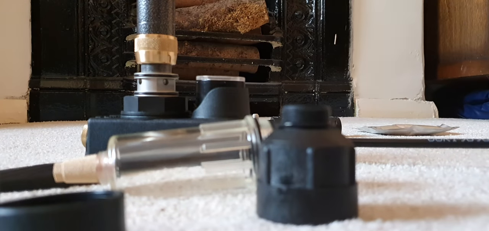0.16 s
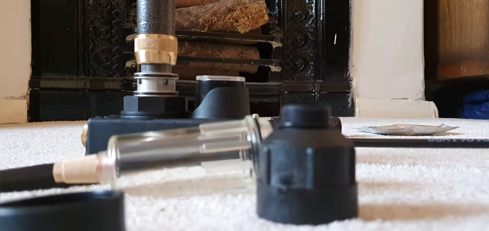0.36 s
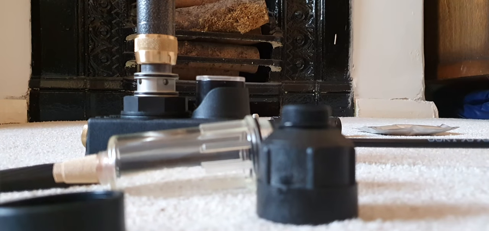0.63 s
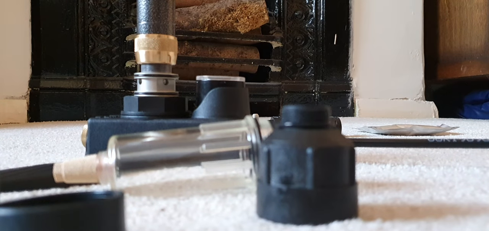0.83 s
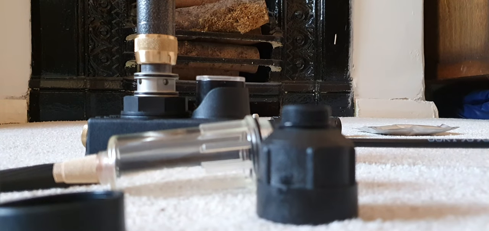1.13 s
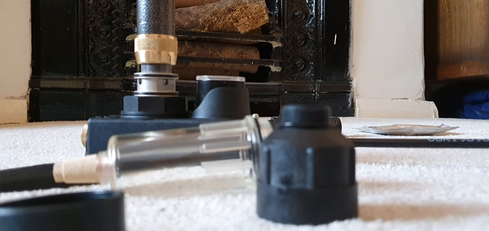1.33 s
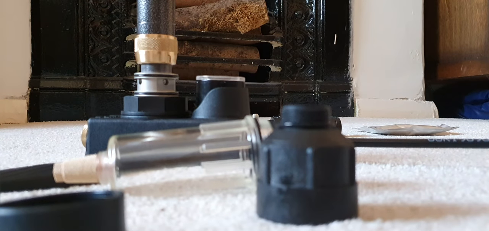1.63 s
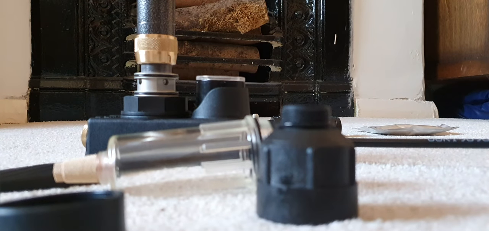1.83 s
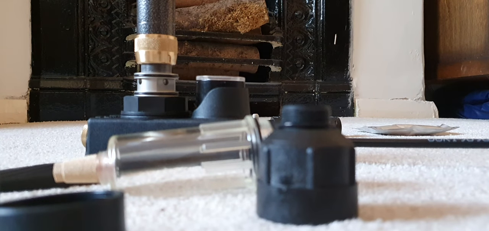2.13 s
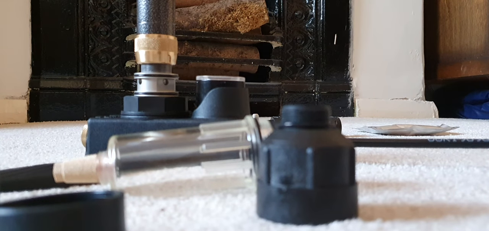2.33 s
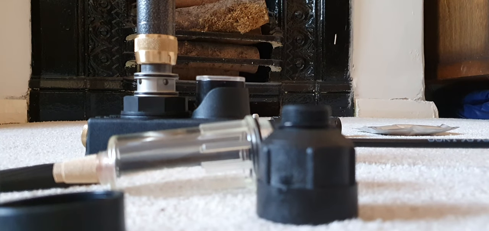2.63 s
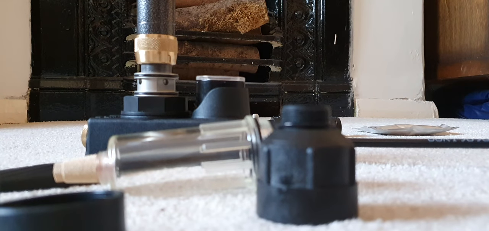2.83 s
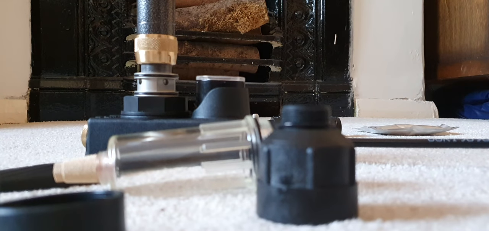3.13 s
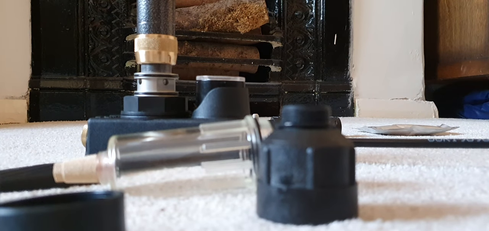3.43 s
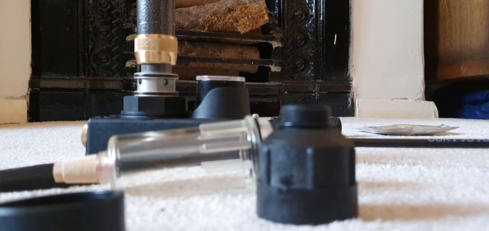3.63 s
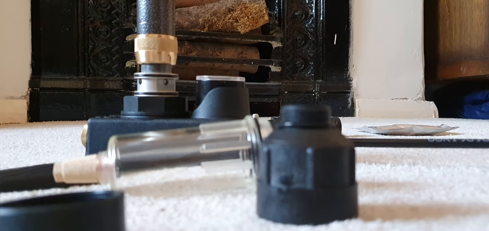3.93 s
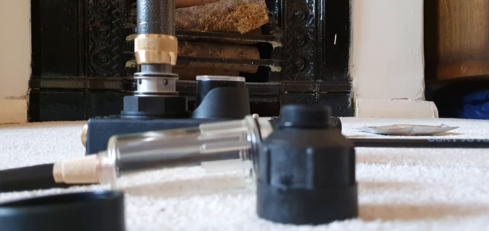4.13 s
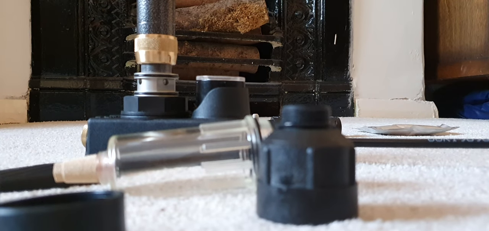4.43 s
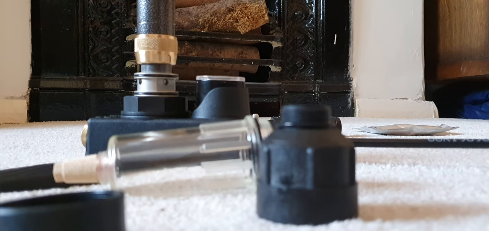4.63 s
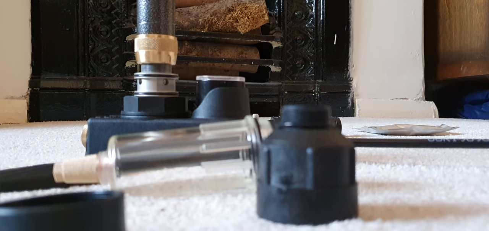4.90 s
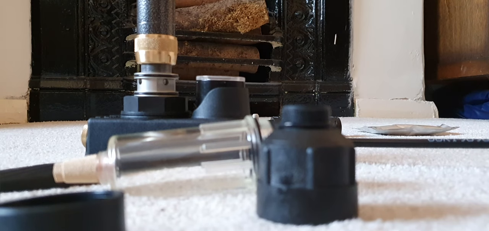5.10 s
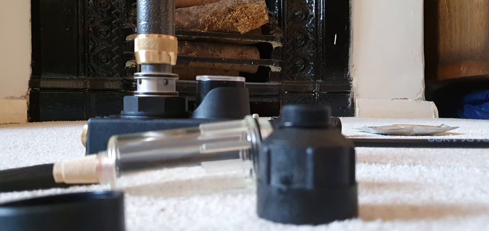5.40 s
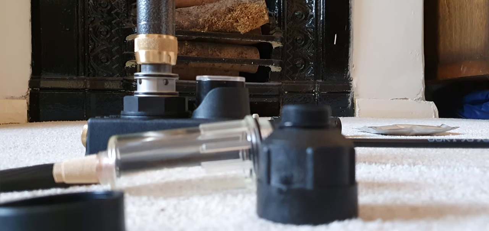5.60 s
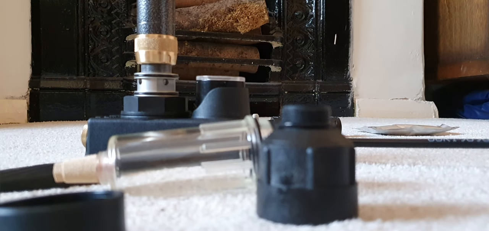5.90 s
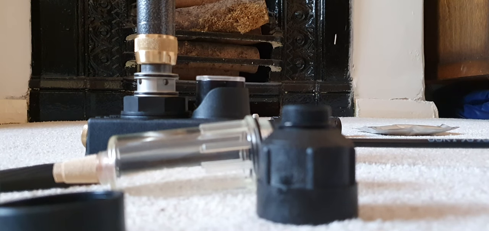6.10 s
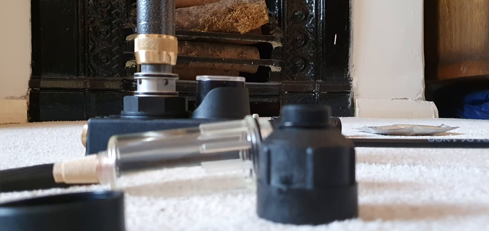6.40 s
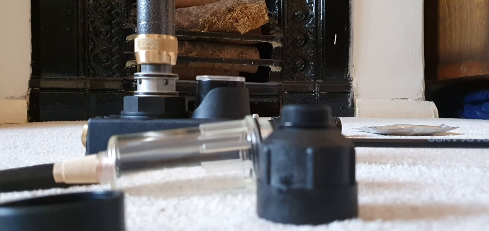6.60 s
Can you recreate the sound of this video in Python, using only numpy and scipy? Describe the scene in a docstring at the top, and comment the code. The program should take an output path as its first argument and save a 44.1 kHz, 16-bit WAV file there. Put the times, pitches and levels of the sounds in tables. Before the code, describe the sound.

Fingers slide over a foil sachet, making short bursts of bright rustling and sharp snaps. A quick, jerky rip comes early, followed by more crinkling and a brief lull. A second short tear arrives in a cluster of crackles, then a few last rustles follow. The sachet is close to the stereo microphone and to the right, in a quiet living room with a faint appliance hum.

```python
"""Tearing open a foil sachet

Living room, stereo camera microphones, the sachet close by and to the right, opened in two pulls.
Fingers slide over the foil, creases buckle with sharp snaps and whole panels flex with a low pop;
each tear is a rush of tiny fractures. The room answers softly over an appliance's faint, beating hum."""
import sys
import numpy as np
from scipy import signal
from scipy.fft import rfft, irfft, next_fast_len
from scipy.io import wavfile
from scipy.ndimage import map_coordinates

SR = 44100
rng = np.random.default_rng(int(sys.argv[2]) if len(sys.argv) > 2 else 0)


def to_wav(s):
    """Save 16-bit WAV."""
    ch = np.atleast_2d(s).T  # columns
    pcm = np.round(np.clip(ch, -1, 1) * 32767)  # PCM
    wavfile.write(sys.argv[1], SR, pcm.astype(np.int16))


N = 297675


def amp(db):
    """Decibels to gain."""
    return 10 ** (np.asarray(db) / 20)


def unit(x):
    """Scale to rms 1."""
    return x / np.sqrt(np.mean(x ** 2) + 1e-20)


def along(points, hz):
    """Read a curve of (f/Hz, value) points on a log frequency axis."""
    f, values = np.transpose(points)
    return np.interp(np.log(hz + 1), np.log(f), values)


def coloured(x, spectrum, size=2048):
    """Pass x through the causal (minimum-phase) filter that has this spectrum."""
    hz = np.fft.rfftfreq(size, 1 / SR)
    cepstrum = irfft(np.log(amp(along(spectrum, hz))))
    cepstrum[1:size // 2] *= 2
    cepstrum[size // 2 + 1:] = 0
    response = irfft(np.exp(rfft(cepstrum)))
    return signal.fftconvolve(x, response[None], axes=1)[:, :x.shape[1]]


# spectrum of the still living room: f/Hz, relative level/dB
ROOM_TONE = [(20, -40.5), (35, -13), (60, -3), (100, 1), (130, -7), (190, -1), (420, -12), (780, -15.5),
             (1400, -37), (2100, -31.5), (3000, -48), (7000, -34), (16000, -45)]
def room_tone(level_db=-69, side_db=-9):
    """Quiet room noise, nearly alike at both microphones."""
    mid, side = unit(coloured(rng.standard_normal((2, N)), ROOM_TONE, size=8192))
    side = amp(side_db) * side
    return amp(level_db) * np.array([mid + side, mid - side])


# motor tones: f/Hz, level/dB
MOTOR_TONES = [(44.1, -73.5), (49.3, -65), (98.7, -76.5)]
def appliance_hum():
    """Two motors beat against each other in a distant appliance."""
    t = np.arange(N) / SR
    return sum(amp(db) * np.sin(2 * np.pi * (hz * t + rng.random())) for hz, db in MOTOR_TONES)


# reverberation of the living room: f/Hz, time to fade by 60 dB/s
ROOM_DECAY = [(100, .5), (500, 0.24), (1500, 0.22), (4000, 0.36), (8000, 0.12), (16000, 0.26)]
def room_echo(x, delay_s=0.004):
    """The room returns a different diffuse tail to each microphone; the bass lingers longest."""
    hz, t, noise = signal.stft(rng.standard_normal((2, SR // 2)), SR, nperseg=256)
    decay = amp(-60 * t / along(ROOM_DECAY, hz)[:, None])
    tail = signal.istft(noise * decay, SR, nperseg=256)[1]
    tail = np.pad(tail / np.linalg.norm(tail[0]), ((0, 0), (round(delay_s * SR), 0)))
    return signal.fftconvolve(x[1:], tail, axes=1)[:, :N]


# shadow at the left microphone, which faces away from the sachet: f/Hz, level/dB
MIC_SHADOW = [(100, -6.5), (600, -6.5), (1400, -2), (3000, -7.5), (7000, -4.5), (8000, -11), (16000, -17.5)]
def mics(pair, alike, lag_samples=16):
    """The right microphone hears pair[0]; the left, later and shadowed, blends in its own paths, pair[1]."""
    far = alike * pair[:1] + np.sqrt(1 - alike ** 2) * pair[1:]
    left = np.pad(coloured(far, MIC_SHADOW)[0], (lag_samples, 0))[:N]
    return np.array([left, pair[0]])


def faint_ring(touch, ring_hz=778, q=70, under_db=-16, ceiling_db=-66):
    """One narrow, wavering resonance that comes and goes with the rustle."""
    ring = unit(signal.lfilter(*signal.iirpeak(ring_hz, q, SR), rng.standard_normal((2, N))))
    gain = np.minimum(amp(under_db) * touch[0], amp(ceiling_db))
    return mics(gain * ring, alike=0.8)


# fingertips meeting the sachet: t/s, relative level/dB
FINGER_BUMPS = [(0.251, -50), (0.439, -44), (2.421, -55), (6.253, -35), (6.519, -51)]
def bumps(thud_hz=330, life_s=0.02, gain_db=8):
    """Each soft push of a fingertip gives a short, dull thud."""
    thuds = np.zeros((2, N))
    t = np.arange(SR // 8) / SR
    thud = np.sin(2 * np.pi * thud_hz * t) * amp(-60 * t / life_s)
    for s, db in FINGER_BUMPS:
        thuds[0, round(s * SR):][:len(t)] += amp(db) * thud
    return amp(gain_db) * mics(thuds, alike=1)


def crackle(per_s, spread_db, life_s, smooth):
    """Envelope of random, uneven micro-bursts over a share of smooth friction."""
    happens = rng.random(N) < per_s / SR
    sizes = amp(spread_db * np.clip(rng.standard_normal(N), -2, 2))
    t = np.arange(SR // 50) / SR
    decay = amp(-60 * t / life_s)
    power = np.abs(signal.fftconvolve((happens * sizes) ** 2, decay ** 2)[:N])
    return np.sqrt(smooth + (1 - smooth) * power / power.mean())


def swells(rows, attack_s, release_s):
    """Facet and panel gains of hand movements: each builds, holds, then fades 60 dB in release_s."""
    t = np.arange(N) / SR
    power = np.zeros((2, N))
    for s, length, facet_db, panel_db in rows:
        near = slice(*np.searchsorted(t, [s, s + length + release_s]))
        age = t[near] - s
        rise = np.sin(np.pi / 2 * np.minimum(age / attack_s, 1)) ** 2
        fade = amp(-60 * np.maximum(age - length, 0) / release_s)
        power[:, near] += (amp([[facet_db], [panel_db]]) * rise * fade) ** 2
    return np.sqrt(power)


# spectrum of the fluttering panels: f/Hz, relative level/dB
PANEL_FLUTTER = [(20, -48.5), (60, -10), (130, -10.5), (280, -5.5), (450, -3.5), (620, -0.5), (950, -1),
                 (1150, -5.5), (1450, -13.5), (3000, -35)]
def foil(bursts, gains, facet_spectrum):
    """Bursts ring the foil's small facets brightly and shake its panels lower down."""
    facet_gain, panel_gain = gains
    facets = unit(coloured(bursts * rng.standard_normal((2, N)), facet_spectrum))
    panels = unit(coloured(bursts * rng.standard_normal((2, N)), PANEL_FLUTTER))
    return mics(facet_gain * facets, alike=0.19) + mics(panel_gain * panels, alike=0.78)


# strokes over the foil: t/s, length/s, facet level/dB, panel level/dB
FINGER_STROKES = [(-0.06, 0.071, -45.5, -55.5), (0.04, 0.088, -41, -55), (0.2, 0.11, -56, -63),
                  (0.305, 0.075, -41, -54.5), (0.392, 0.049, -33, -45.5), (0.495, 0.069, -45.5, -54.5),
                  (0.58, 0.08, -51.5, -55.5), (0.65, 0.055, -43.5, -51), (0.735, 0.089, -45.5, -51.5),
                  (0.85, 0.2, -50, -63), (1.11, 0.16, -56, -64.5), (1.235, 0.15, -41.5, -53),
                  (1.67, 0.06, -47, -54), (1.735, 0.08, -44, -59), (1.91, 0.077, -54.5, -67),
                  (2.025, 0.11, -51, -59.5), (2.125, 0.08, -37, -51), (2.21, 0.26, -50, -60.5),
                  (2.57, 0.057, -50.5, -65), (2.83, 0.125, -47.5, -54), (2.97, 0.07, -52.5, -67),
                  (3.675, 0.093, -55, -64), (3.885, 0.062, -46.5, -63.5), (3.99, 0.22, -53.5, -62),
                  (4.385, 0.12, -41, -52), (4.76, 0.06, -55.5, -73), (5.39, 0.076, -55, -59),
                  (5.85, 0.053, -47.5, -59), (5.95, 0.255, -51.5, -61.5), (6.2, 0.093, -41, -53),
                  (6.375, 0.093, -46.5, -54), (6.482, 0.057, -34.5, -39), (6.595, 0.071, -51, -51)]
def fingers(grip_facet_db=-66, grip_panel_db=-78, wander_db=2, shifts_per_s=14):
    """Facet and panel gains of the strokes, over a light grip that is never quite steady."""
    knots = rng.standard_normal(int(N * shifts_per_s / SR) + 4)
    wander = map_coordinates(knots, [np.arange(N) * shifts_per_s / SR])
    grip = amp(np.array([[grip_facet_db], [grip_panel_db]]) + wander_db * wander)
    return np.hypot(swells(FINGER_STROKES, attack_s=0.048, release_s=0.26), grip)


# the facets' main resonances, all that a light touch wakes: f/Hz, relative level/dB
LIGHT_BRUSH = [(600, -37.5), (1400, -24.5), (2100, -14.5), (2850, -5), (4200, -2), (5200, -7), (7200, -3.5),
               (8400, -12), (12700, -18.5), (16000, -21.5)]
def ticks(touch, per_s=140, pitch_hz=3600, pitch_spread=0.17, cycles=7, spread_db=5, size=400):
    """Tiny facets click over at random, each at its own pitch and gone within a few cycles."""
    when, pitch, force = rng.random((int(per_s * N / SR), 3)).T[:, :, None]
    start = (when * (N - size)).astype(int)
    hz = pitch_hz * (pitch / (1 - pitch)) ** (pitch_spread / 2)
    strength = amp(spread_db * np.minimum(-np.log(force), np.e))
    turns = hz * np.arange(size) / SR
    grains = strength * np.sin(2 * np.pi * turns) * amp(-60 * turns / cycles)
    clicks = np.bincount((start + np.arange(size)).ravel(), grains.ravel(), N)
    clicks = unit(coloured(clicks[None], LIGHT_BRUSH)[0])  # they ring the same sheet
    return mics(touch[0] * np.array([clicks, np.zeros(N)]), alike=0.9)


# spectrum of foil under firm fingers: f/Hz, relative level/dB
FIRM_CRINKLE = [(600, -36), (1400, -13.5), (2100, -5), (2850, 0), (4200, 0.5), (5000, -6), (7200, -5),
                (8400, -11.5), (12700, -12), (16000, -22)]
def handling(touch, firm_db=-55, blend_db=7):
    """Sliding fingertips set off small crackles; the firmer they press, the broader the sound."""
    bursts = crackle(per_s=500, spread_db=5, life_s=0.013, smooth=0.51)
    pressure_db = 20 * np.log10(touch[0])
    firm = (1 + np.tanh((pressure_db - firm_db) / blend_db)) / 2
    crinkle = np.sqrt(firm) * foil(bursts, touch, FIRM_CRINKLE)
    brush = np.sqrt(1 - firm) * foil(bursts, touch, LIGHT_BRUSH)
    return amp(-0.15) * (crinkle + brush) + amp(-5) * ticks(touch)


def stray_creases(touch, per_s=6, over_db=5.5, spread_db=3, pitch_hz=3200, pitch_spread=0.2, pop_db=-19):
    """Rows like MAIN_CREASES for slight creases that flip by chance, louder as the rustle grows."""
    rows = []
    for when, size, pitch in rng.uniform(-1, 1, (int(per_s * N / SR), 3)):
        at = int((when + 1) / 2 * (N - 1))
        rustle_db = 20 * np.log10(touch[0, at])
        snap_db = min(rustle_db + over_db, -42) + spread_db * size
        rows.append((at / SR, snap_db, pitch_hz * np.exp(pitch_spread * pitch), snap_db + pop_db))
    return rows


# spectra of a buckling crease and of the panel popping around it: f/Hz, relative level/dB
CREASE_CRACK = [(500, -30), (1400, -14), (2000, -4.5), (2800, -1.5), (4300, -5), (6800, -5.5), (8200, -9),
                (12700, -13), (16000, -21)]
PANEL_POP = [(20, -40), (60, -11), (130, -20), (280, -12), (450, -5), (700, -2.5), (1050, -2),
             (1450, -12.5), (3000, -64.5)]
# the main creases that buckle: t/s, snap level/dB, snap f/Hz, pop level/dB
MAIN_CREASES = [(0.1636, -20.5, 4300, -39.5), (0.4187, -30, 3270, -49), (0.4291, -33, 1900, -36),
                (0.6849, -27, 6640, -50), (0.7961, -25, 2900, -34), (0.8081, -30.5, 3280, -52),
                (0.9762, -34, 3700, -47), (0.9819, -30, 2600, -35.5), (1.2169, -26.5, 2600, -42),
                (1.2725, -33, 2720, -49.5), (1.467, -24, 4900, -55), (1.5519, -35, 4200, -21),
                (1.6313, -24.5, 3400, -44), (1.6568, -17.5, 3900, -35), (1.7108, -33.5, 3100, -53.5),
                (2.0447, -40.5, 3370, -47.5), (2.1392, -30.5, 3850, -43.5), (2.1826, -17.5, 4250, -49),
                (2.4228, -43, 4500, -42.5), (2.8405, -22, 6100, -35.5), (2.8765, -31.5, 2800, -36.5),
                (2.9263, -21.5, 2840, -26.5), (2.9446, -20, 4070, -37), (2.9527, -31.5, 2600, -31.5),
                (3.2242, -48, 6200, -61.5), (3.7298, -45, 3430, -44), (3.841, -47, 2190, -54),
                (4.0413, -30.5, 2070, -43.5), (4.0791, -25, 2340, -27.5), (4.1519, -25.5, 4100, -36),
                (4.1584, -32.5, 4020, -60), (4.2994, -22, 3320, -49), (4.3324, -21, 4100, -28),
                (4.3535, -14, 4000, -32), (4.447, -22, 5000, -35.5), (4.518, -31.5, 2500, -29),
                (4.65, -50.5, 4200, -74), (5.4471, -37, 3400, -39.5), (6.0256, -41, 3720, -56),
                (6.1489, -41.5, 3100, -45.5), (6.2471, -41.5, 2900, -33), (6.2546, -22.5, 3180, -26)]
def snaps(strays, ring_s=0.013, scatter=0.16, q=4.2, broad_db=-11, pop_ring_s=0.017, pop_scatter=0.09):
    """Each crease flips with one sharp pulse and a brief scattered ring, and pops the panel around it."""
    size = 2048
    t = np.arange(size) / SR
    hz = np.fft.rfftfreq(size, 1 / SR) + 1
    span = SR * 0.004  # levels are rms over 4 ms
    cracks, pops = np.zeros((2, 2, N + size))
    for s, snap_db, pitch_hz, pop_db in list(MAIN_CREASES) + strays:
        # the flipping facet has one resonance, set by its size, over a broad crack
        resonance = 1 / (1 + (q * (hz / pitch_hz - pitch_hz / hz)) ** 2)
        facet_db = along(CREASE_CRACK, hz) + 10 * np.log10(resonance + amp(broad_db) ** 2)
        flip = scatter * rng.standard_normal((2, size)) * amp(-60 * t / ring_s)
        push = pop_scatter * rng.standard_normal((2, size)) * amp(-60 * t / pop_ring_s)
        flip[0, 0] = push[0, 0] = 1  # the sharp pulse
        crack = coloured(flip, np.transpose([hz, facet_db]))
        pop = coloured(push, PANEL_POP)
        start = round(s * SR)
        cracks[:, start:start + size] += amp(snap_db) * crack * np.sqrt(span / np.sum(crack[0] ** 2))
        pops[:, start:start + size] += amp(pop_db) * pop * np.sqrt(span / np.sum(pop[0] ** 2))
    return mics(cracks[:, :N], alike=0.087) + mics(pops[:, :N], alike=1)


# spectrum of the ripping laminate: f/Hz, relative level/dB
LAMINATE_RIP = [(600, -30.5), (1400, -16), (2200, -13.5), (2800, -1.5), (4200, 0.5), (5500, -5),
                (7200, -4.5), (8200, -11.5), (10500, -13), (12700, -14), (16000, -20)]
# jerks of the first pull: t/s, length/s, fracture level/dB, panel level/dB
FIRST_PULL = [(1.392, 0.06, -28.5, -45.5), (1.443, 0.055, -19.5, -39.5), (1.552, 0.052, -19, -37),
              (1.62, 0.035, -15, -37)]
def first_tear():
    """The tear jerks through the laminate in dense, even-grained fractures."""
    fractures = crackle(per_s=2400, spread_db=3, life_s=0.004, smooth=0.3)
    return foil(fractures, swells(FIRST_PULL, attack_s=0.033, release_s=0.12), LAMINATE_RIP)


# course of the second pull: t/s, fracture level/dB, panel level/dB
SECOND_PULL = [(4.276, -66, -62), (4.2785, -28.5, -40), (4.3, -23, -40), (4.345, -24.5, -35.5),
               (4.365, -22, -33), (4.385, -31, -46), (4.41, -31, -45.5), (4.45, -65.5, -84)]
def second_tear():
    """The tear runs through in one go, its fractures sparser and more ragged."""
    fractures = crackle(per_s=1400, spread_db=3, life_s=0.004, smooth=0.35)
    t = np.arange(N) / SR
    times, *levels = np.transpose(SECOND_PULL)
    gains = [amp(np.interp(t, times, db, left=-120, right=-120)) for db in levels]
    return foil(fractures, gains, FIRM_CRINKLE)


def scene():
    """The sachet close on the right, its soft echo and the quiet living room behind."""
    touch = fingers()
    sachet = snaps(stray_creases(touch)) + first_tear() + second_tear()
    sachet += handling(touch) + bumps() + faint_ring(touch)
    return sachet + amp(-16) * room_echo(sachet) + room_tone() + appliance_hum()


def record(dry, top_hz=16100):
    """The camera keeps nothing above its band limit."""
    size = next_fast_len(N + 8192)
    in_band = np.fft.rfftfreq(size, 1 / SR) < top_hz
    return irfft(rfft(dry, size) * in_band, size)[:, :N]


dry = scene()
out = record(dry)
to_wav(out)
```